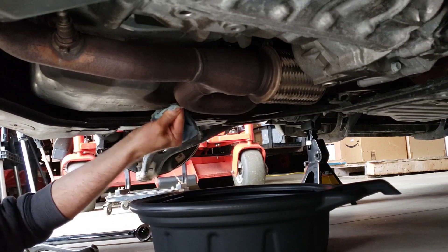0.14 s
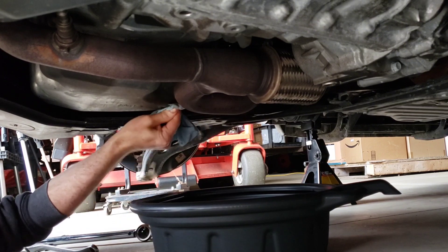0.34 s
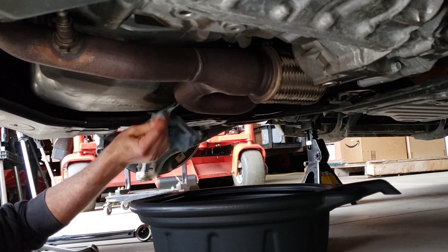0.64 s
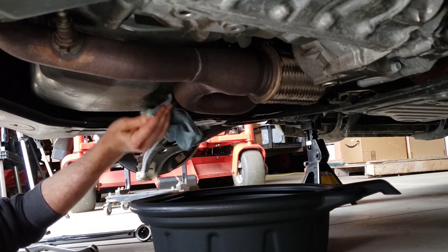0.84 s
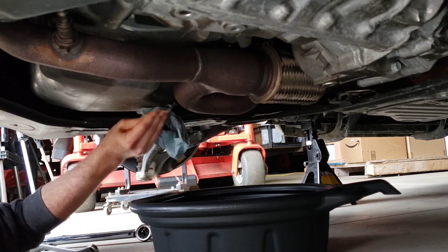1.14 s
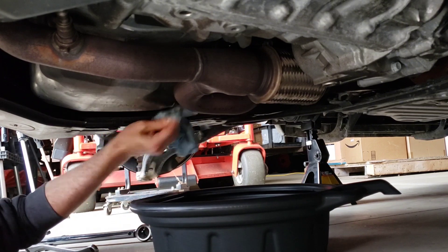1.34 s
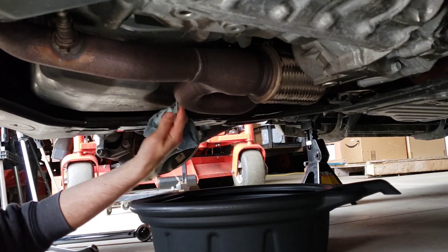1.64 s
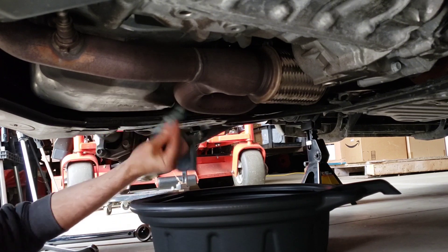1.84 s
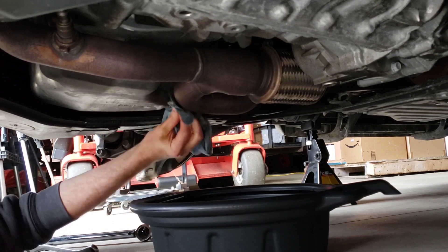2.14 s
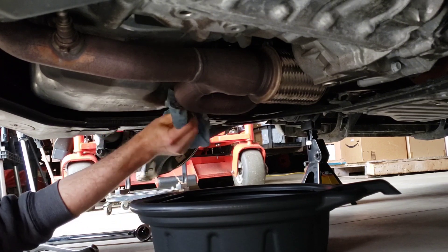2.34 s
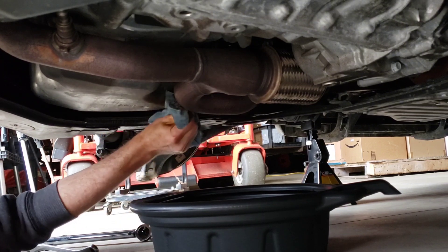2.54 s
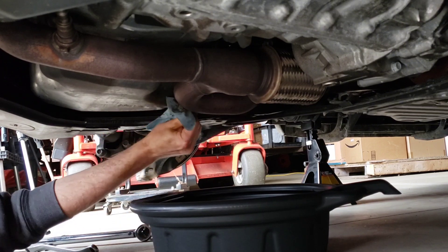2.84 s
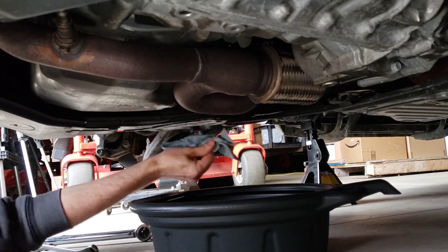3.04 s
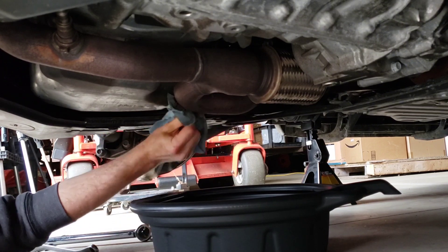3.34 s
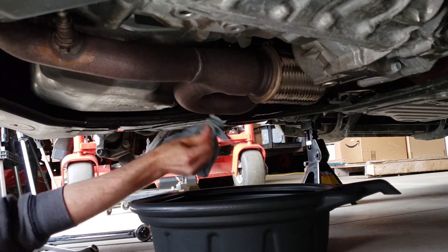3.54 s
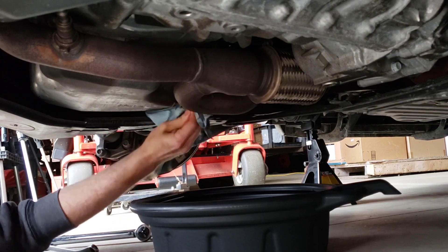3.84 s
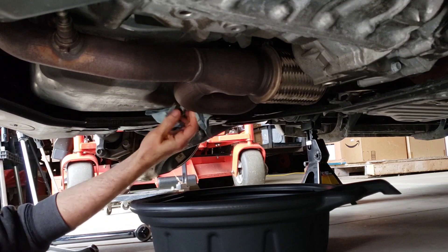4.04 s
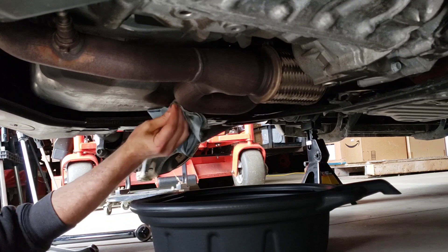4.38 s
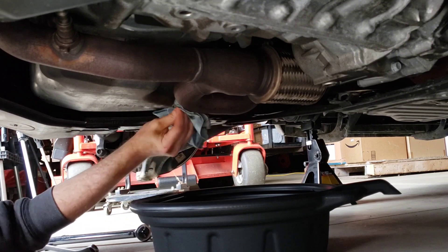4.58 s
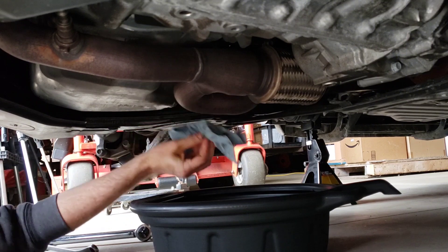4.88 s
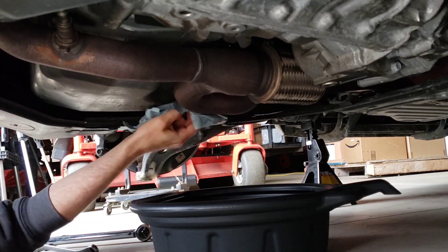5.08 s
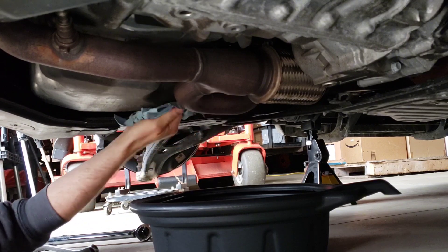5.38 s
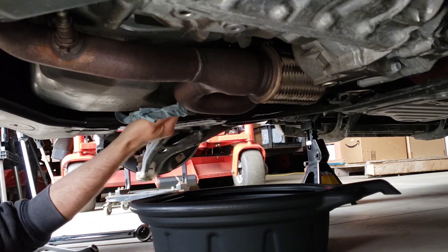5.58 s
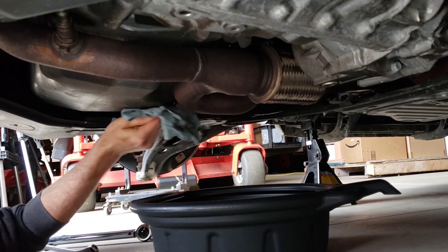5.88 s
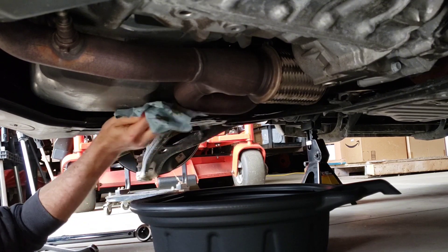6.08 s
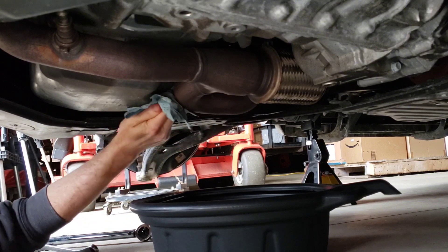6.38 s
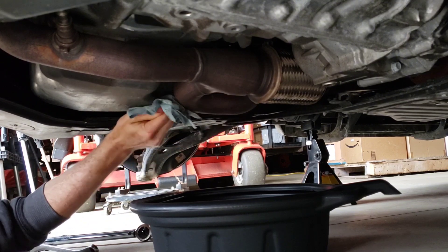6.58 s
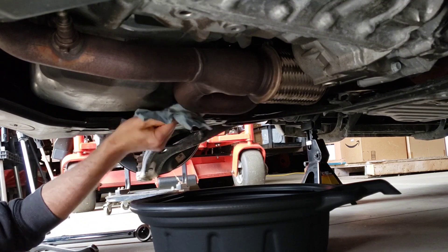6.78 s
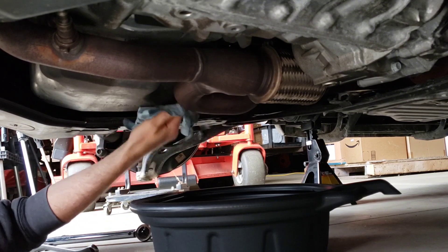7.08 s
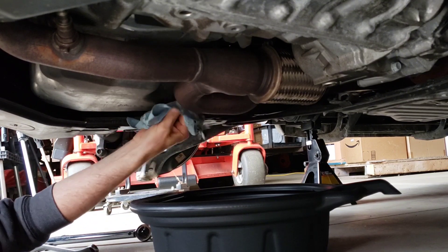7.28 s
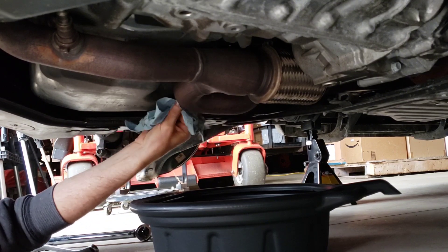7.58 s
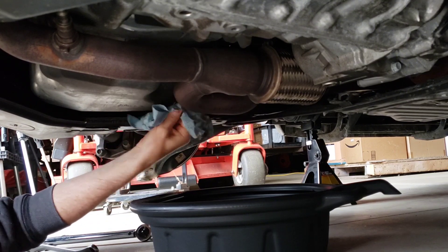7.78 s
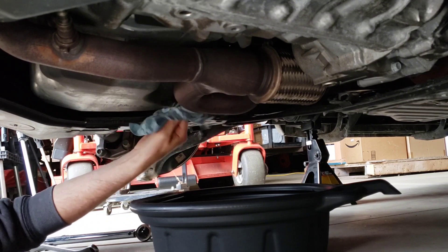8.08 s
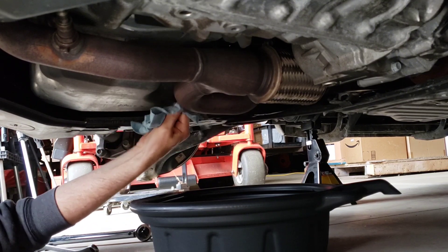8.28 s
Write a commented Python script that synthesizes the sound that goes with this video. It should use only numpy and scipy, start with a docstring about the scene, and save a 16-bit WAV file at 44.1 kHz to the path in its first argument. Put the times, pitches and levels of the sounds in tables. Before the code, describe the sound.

Under a car in an open garage, heard close in stereo, a shop rag wipes a steel oil pan. From 0 s light, irregular swishes and soft rubs come in short strokes, with a tiny tap at the start and stronger strokes around 1.2 and 1.8 s. Outside, a vehicle's low engine note and tyre roar recede, the engine gone by 3 s and the roar dulling onward. A small bird gives thin dipping, rising whistles at about 0.1, 0.8 and 1.7 s. A bright cloth flick snaps at 2.9 s; a sharp, ringing knock on the pan lands at 3.8 s. Wiping grows busier from 4.2 s, with small taps near 4.7, a crisp flick at 5.3, and brief metallic catches. Rubs, soft low bumps and another flick near 7.1 s continue, with a ringing catch at 7.7, until 8.4 s. Low uneven traffic rumble and faint hiss persist.

```python
"""Light swishes and firmer rubs of a shop rag on a steel oil pan, under a car in an open garage: random fibre noise
shaped by hand strokes, light and firm alike also exciting the pan's modes. Flicks, soft bumps, small taps and one
sharp knock are noise bursts, the taps and knock with ringing modes; catches swell single modes. Outside, a vehicle
(fading noise and a two-partial engine note) drives away over a low, uneven traffic rumble and faint hiss, while a
small bird whistles three gliding songs."""
import sys
import numpy as np
from scipy import signal
from scipy.fft import rfft, irfft, next_fast_len
from scipy.io import wavfile
from scipy.ndimage import uniform_filter1d, map_coordinates

SR = 44100
rng = np.random.default_rng(int(sys.argv[2]) if len(sys.argv) > 2 else 0)


def unload_audio(sound):
    """Save the sound as a 16-bit wav file, at the path given as the first command line argument."""
    columns = np.transpose(np.atleast_2d(sound))
    # keep every value between -1 and 1, then stretch to whole-number steps
    steps = np.round(np.clip(columns, -1, 1) * 32767)
    wavfile.write(sys.argv[1], SR, steps.astype(np.int16))


N = 371322  # length in samples

# Colour of the light swishes as heard, with a step up near 8 kHz: frequency_hz, relative density_db (per Hz)
SWISH_COLOUR = [(500, -38), (2000, -18), (5000, -8), (7300, -9), (8400, -1), (11000, 0), (13000, -1),
                (15800, -5.5)]
# Colour of the firm rubs as heard: frequency_hz, relative density_db (per Hz)
RUB_COLOUR = [(120, -31.5), (300, -2.5), (450, -7), (680, -4), (1000, -3), (1600, 1), (1950, 4), (2350, -1),
              (2900, 4), (3550, -3.5), (4050, 0), (5500, -4.5), (7500, -8), (15000, -37.5)]
# Left-right likeness of cloth and contact noise: frequency_hz, coherence (-1 to 1)
CLOSE_LIKENESS = [(290, .9), (640, 0.32), (1400, 0.13), (3100, 0.16), (7000, 0.024), (15000, 0.087)]
# Left-right likeness of the street and the soft bumps: frequency_hz, coherence (-1 to 1)
WIDE_LIKENESS = [(130, .95), (290, 0.94), (640, 0.095), (1400, -0.45), (3000, 0.98), (7000, -0.75)]


def amp(db):
    """Decibels to gain."""
    return 10 ** (np.asarray(db) / 20)


def unit(x):
    """Scale x to rms 1."""
    return x / np.sqrt(np.mean(x ** 2) + 1e-20)


def along(points, hz):
    """Read (Hz, value) points along a log frequency axis."""
    point_hz, values = np.transpose(points)
    return np.interp(np.log(hz + 1), np.log(point_hz), values)


def curves(rows):
    """Draw each column after the time as one value per sample."""
    times, *columns = np.transpose(rows)
    return [np.interp(np.arange(N) / SR, times, column) for column in columns]


def wobble(rate_hz):
    """A smooth random curve through rate_hz random knots a second."""
    knots = rng.standard_normal(int(N * rate_hz / SR) + 4)
    return map_coordinates(knots, [np.arange(N) * rate_hz / SR])


def filtered(x, response):
    """Multiply the spectrum of x by a response of frequency."""
    size = x.shape[-1]
    padded = next_fast_len(size + 8192)
    return irfft(rfft(x, padded) * response(np.fft.rfftfreq(padded, 1 / SR)), padded)[..., :size]


def noise(size=N):
    """Two unrelated channels of white noise."""
    return rng.standard_normal((2, size))


def stereo(pair, spectrum, likeness):
    """Colour two unrelated signals and mix them, as mid and side, to a left-right pair of rms 1."""
    def mid_side_gains(hz):
        angle = np.arccos(np.clip(along(likeness, hz), -1, 1)) / 2
        return amp(along(spectrum, hz)) * [np.cos(angle), np.sin(angle)]

    mid, side = filtered(pair, mid_side_gains)
    return unit(np.array([mid + side, mid - side]))


def dying(pair, decay):
    """Let each frequency of a noise die at its own speed."""
    hz, t, bins = signal.stft(pair, SR, nperseg=128)
    faded = bins * amp(-60 * t / along(decay, hz)[:, None])
    return signal.istft(faded, SR, nperseg=128)[1][:, :pair.shape[1]]


def add(track, start_s, sound):
    """Mix a sound into the track from start_s on."""
    part = track[:, max(round(start_s * SR), 0):][:, :sound.shape[-1]]
    part += sound[..., :part.shape[1]]


def wiping(rustle_db=-74, rustle_swing_db=3.5, drop_db=20.5, roundness=1.385):
    """Swish and rub strength: strokes gather speed and slow, pressure adds rub, the bunched rag rustles on."""
    # hand strokes: fastest_s, run_up_s, run_out_s, relative swish level_db, pressure_db (rub over swish)
    strokes = [(0.03, 0.096, 0.079, -61, -4), (0.19, 0.085, 0.13, -62.5, -1),
               (0.477, 0.11, 0.063, -55, -1.5), (0.606, 0.124, 0.139, -50, -4),
               (0.878, 0.1, 0.077, -62, -15), (1.002, 0.13, 0.067, -53.0, -8),
               (1.217, 0.067, 0.06, -42, -11), (1.447, 0.14, 0.091, -55.5, -8.5),
               (1.489, 0.041, 0.033, -48.0, -3.5), (1.67, 0.084, 0.127, -61.5, -3),
               (1.804, 0.05, 0.089, -45.5, -9.5), (2.122, 0.43, 0.084, -60.0, -30),
               (2.22, 0.091, 0.246, -59, -7.5), (2.367, 0.056, 0.312, -63, -3.5),
               (2.745, 0.107, 0.146, -59.5, -8), (2.953, 0.033, 0.045, -41.5, -9.5),
               (3.474, 0.054, 0.056, -45.0, -23), (3.648, 0.058, 0.172, -60.5, -16),
               (3.754, 0.046, 0.053, -60, -3), (3.873, 0.089, 0.19, -57.5, -7),
               (4.196, 0.055, 0.106, -44.5, -5.5), (4.332, 0.18, 0.088, -47.5, 0),
               (4.55, 0.05, 0.048, -52, -2), (4.752, 0.053, 0.041, -40.5, -4),
               (5.072, 0.11, 0.072, -53, -8), (5.142, 0.16, 0.103, -58.5, 0.5),
               (5.316, 0.068, 0.1, -50, -2), (5.416, 0.076, 0.25, -67, 1.5), (5.735, 0.13, 0.062, -59, -6),
               (5.891, 0.14, 0.097, -52.5, -0.5), (6.057, 0.048, 0.11, -49, -7.5),
               (6.238, 0.17, 0.13, -49.0, -3), (6.365, 0.1, 0.068, -54, -0.5),
               (6.517, 0.064, 0.064, -45, -5.5), (6.607, 0.043, 0.056, -57.5, -4),
               (6.792, 0.13, 0.074, -48, -3.5), (6.882, 0.098, 0.045, -59.5, -6),
               (7.089, 0.044, 0.085, -49.5, -5.5), (7.315, 0.15, 0.056, -57.5, -4),
               (7.737, 0.052, 0.14, -58, 0.5), (7.91, 0.039, 0.074, -60.5, -6),
               (8.08, 0.052, 0.098, -58, -2.5), (8.182, 0.061, 0.076, -59.5, -6.5)]
    t = np.arange(N) / SR
    swish_power = amp(rustle_db + rustle_swing_db * wobble(9)) ** 2
    rub_power = np.zeros(N)
    for s, run_up, run_out, db, pressure_db in strokes:
        span = slice(*np.searchsorted(t, [s - 2 * run_up, s + 2 * run_out]))
        away = np.maximum((s - t[span]) / run_up, (t[span] - s) / run_out)
        # drop_db down after one run-up or run-out; roundness 1 is a pointed top, 2 a bell
        speed = amp(db - drop_db * away ** roundness)
        swish_power[span] += speed ** 2
        rub_power[span] += (speed * amp(pressure_db)) ** 2
    return np.sqrt(swish_power), np.sqrt(rub_power)


def fibres(rate_hz, size_db, smooth):
    """Friction: fibres snap free at random, over the smooth hiss of the weave."""
    sizes = amp(size_db * np.minimum(rng.exponential(size=N), 4))
    snaps = (rng.random(N) < rate_hz / SR) * sizes
    return unit(snaps * noise()) + smooth * noise()


def pan_ring(rattle=0.31):
    """The steel's answer to one blow: decaying modes, jittered in phase by rattle, out of step left and right."""
    # oil pan modes: frequency_hz, relative level_db, t60_s
    modes = [(922, -19.5, .16), (970, -18, .15), (1257, -17, .13), (1332, -8, .13), (1469, -18, .3),
             (1517, -22, .36), (1883, 2.5, .085), (2374, -19, .12), (2885, -12, .07), (3982, -3, .065),
             (5085, -9, .06), (5605, -9, .06), (6727, -4, .055), (8560, -11, .05), (9352, -6, .05),
             (11075, -9, .06), (11520, -5, .05), (12402, -5, .05)]
    t = np.arange(SR // 2) / SR
    hz, db, t60 = np.transpose(modes)[:, :, None]
    jitter = unit(uniform_filter1d(rng.standard_normal((len(modes), len(t))), size=300))
    phase = rng.uniform(0, 2 * np.pi, hz.shape) + rattle * jitter  # radians
    fade = amp(db - 60 * t / t60) / np.linalg.norm(amp(db))
    turns = 2 * np.pi * hz * t + phase
    return np.array([np.sum(fade * np.sin(turns + side * np.pi / 5), axis=0) for side in (1, -1)])


def rag(swish_db=3.5, rub_db=1.0, ring_db=-10, sing_db=-12, soft_hz=2400, damp_t60=0.034):
    """Sliding cloth hisses, pressed harder it sounds fuller; light and firm strokes both set the pan ringing."""
    swish, rub = wiping()
    judder_db = 1.3 * wobble(130) + 1.4 * wobble(35)  # the cloth grips and slips unevenly
    light_grain = stereo(fibres(rate_hz=4000, size_db=3.0, smooth=1.4), SWISH_COLOUR, CLOSE_LIKENESS)
    firm_grain = stereo(fibres(rate_hz=1200, size_db=1.0, smooth=1.0), RUB_COLOUR, CLOSE_LIKENESS)
    light = swish * amp(swish_db + judder_db) * light_grain
    firm = rub * amp(rub_db + judder_db + 0.59 * wobble(70)) * firm_grain
    # a soft pad pressed on the sheet drives mostly its low modes and shortens their ring
    push = filtered(firm[:1], lambda hz: 1 / (1 + (hz / soft_hz) ** 4))
    damped_steel = pan_ring() * amp(-60 * np.arange(SR // 2) / SR / damp_t60)
    damped_steel /= np.linalg.norm(damped_steel[0])
    drive = amp(ring_db) * push + amp(sing_db) * light[:1]
    return light + firm + signal.fftconvolve(drive, damped_steel, axes=1)[:, :N]


def puffs(events, spectrum, likeness, t60):
    """Soft contacts without a ring: short bursts of coloured noise."""
    out, t = np.zeros((2, N)), np.arange(SR // 2) / SR
    for s, db, rise in events:
        envelope = amp(db - 60 * t / t60) * (1 - np.exp(-t / rise))
        add(out, s, envelope * stereo(noise(len(t)), spectrum, likeness))
    return out


def flicks():
    """Folds of the cloth flick free in bright puffs."""
    # fold releases: start_s, relative level_db, rise_s
    releases = [(.80, -60.5, .002), (1.397, -54, .002), (2.943, -39, .0006), (3.055, -55.5, .0018),
                (3.42, -51.5, 0.00093), (5.287, -37.5, 0.00061), (6.026, -51, .0011), (7.08, -40, .007),
                (8.329, -53.5, .001)]
    return puffs(releases, SWISH_COLOUR, CLOSE_LIKENESS, t60=.12)


def catches(rise_cycles=32, t60_cycles=250, waver=1.05, rough_db=1.0):
    """Dragging over an edge swells one mode unevenly, which then rings out; low modes are slower."""
    # cloth catching an edge: peak_s, relative level_db, mode_hz
    edges = [(1.49, -53, 1884), (2.13, -68, 620), (2.85, -62, 1900), (2.943, -49, 1900), (3.76, -52, 1880),
             (4.21, -47.5, 1884), (4.25, -60, 677), (4.57, -52, 1885), (4.61, -62, 1450),
             (4.705, -48.5, 1864), (4.752, -45.5, 1874), (5.16, -58.5, 1835), (5.30, -52.5, 1840),
             (5.345, -57, 1500), (6.52, -51, 1910), (6.55, -64.5, 855), (6.80, -60, 853),
             (7.11, -59.5, 1360), (7.315, -58.5, 877), (7.742, -43.5, 1890), (7.79, -64, 864),
             (8.184, -59.5, 1880)]
    out, t = np.zeros((2, N)), np.arange(-SR // 10, SR // 3) / SR
    slips = np.array([waver * wobble(150), rough_db * wobble(200)])  # phase in radians, level in dB
    for s, db, hz in edges:
        cycles = hz * t
        swell = np.where(t < 0, np.exp(-(cycles / rise_cycles) ** 2), amp(-60 * cycles / t60_cycles))
        drift, grip_db = np.roll(slips, -round(s * SR), axis=1)[:, :len(t)]
        add(out, s + t[0], amp(db + grip_db) * swell * np.sin(2 * np.pi * cycles + drift))
    return out


def taps(crack_db=-2, steel_db=2, burst_s=0.012, attack_s=0.0018, buzz_db=-30, buzz_t60=0.32):
    """Each hard contact cracks, strongest in its first milliseconds, and rings the pan over a faint noisy buzz."""
    # contacts with the pan: start_s, relative level_db, relative ring_db
    contacts = [(.045, -53, -12), (3.635, -58.5, -8), (3.785, -24, 10), (4.667, -59.5, 9),
                (4.698, -50.5, 2), (5.286, -55.5, -6.5), (5.432, -56.5, -7.5), (7.732, -54.5, 4),
                (8.329, -60.5, -0.5)]
    # colour of the crack: frequency_hz, relative density_db (per Hz)
    crack_colour = [(300, -51), (650, -31), (950, -11), (1400, 2), (1950, 1), (2300, -5.5), (2950, 10.5),
                    (3500, -3.5), (4100, 2.5), (7000, 2), (12500, 9), (15800, -6.5)]
    # fading of the crack: frequency_hz, t60_s
    crack_decay = [(1000, 0.08), (2500, 0.089), (6000, 0.1), (14000, 0.1)]
    out, t = np.zeros((2, N)), np.arange(SR // 2) / SR
    for s, db, ring_db in contacts:
        crack = dying(stereo(noise(len(t)), crack_colour, CLOSE_LIKENESS), crack_decay)
        crack *= 1 + 0.99 * np.exp(-(t / burst_s) ** 4)
        ring = amp(steel_db) * pan_ring() * (1 - np.exp(-t / 0.0031))
        buzz = amp(buzz_db - 60 * t / buzz_t60) * stereo(noise(len(t)), RUB_COLOUR, CLOSE_LIKENESS)
        contact = amp(crack_db) * crack + amp(ring_db) * (ring + buzz)
        add(out, s, amp(db) * (1 - np.exp(-t / attack_s)) * contact)
    return out


def bumps(bump_db=3):
    """The hand bumps softly against the underbody: low puffs."""
    # hand contacts: start_s, relative level_db, rise_s
    contacts = [(1.19, -53, 0.015), (2.935, -60, .012), (4.22, -58.5, .012), (4.33, -53, 0.013),
                (4.74, -62, 0.013), (5.3, -55.5, .012), (6.05, -58, .012), (6.51, -58.5, 0.011),
                (6.765, -53, 0.0037), (8.08, -53.5, 0.0074)]
    # colour of a bump: frequency_hz, relative density_db (per Hz)
    thud_colour = [(50, -27), (110, -2.5), (170, -1), (300, -5), (420, -19), (1200, -50.5)]
    return amp(bump_db) * puffs(contacts, thud_colour, WIDE_LIKENESS, t60=0.36)


def underbody(x, reach_s=0.011, count=8):
    """Close reflections between the floor and the car, a different set left and right."""
    echoes = np.zeros((2, SR // 10))
    for channel in echoes:
        delays = (rng.uniform(.001, reach_s, count) * SR).astype(int)
        channel[delays] = (-1) ** np.arange(count) / np.sqrt(count)
    return signal.fftconvolve(x, echoes, axes=1)[:, :N]


def garage(x):
    """The diffuse answer of floor, underbody and walls: a decaying noise tail."""
    # room decay: frequency_hz, t60_s
    room_decay = [(200, 0.55), (1500, 0.42), (5000, 0.16), (14000, 0.1)]
    tail = dying(noise(SR // 2), room_decay)
    delayed = np.pad(x, ((0, 0), (300, 0)))  # samples before the tail begins
    return signal.fftconvolve(delayed, tail / np.linalg.norm(tail[0]), axes=1)[:, :N]


def bird(waver=0.017, drift=0.008, call_db=-3.5, flutter_db=4.5, blur_t60=0.18, fullness=0.24):
    """Thin wavering whistles that dip and then climb, blurred by their many ways in from outside."""
    # songs: start_s, length_s, top_hz (before the quaver), relative level_db
    songs = [(.08, 0.23, 8300, -63), (0.811, 0.29, 8130, -64), (1.654, .345, 8000, -60.5)]
    start_hz, low_hz = 6150, 5840
    turn, bend = .2, 1.7  # share of the song before the lowest pitch; curve of the climb
    out = np.zeros((1, N))
    quaver = 1 + waver * wobble(350) + drift * wobble(30)
    for s, length, top_hz, db in songs:
        u = np.linspace(0, 1, round(length * SR))
        sag = np.maximum(1 - u / turn, 0)
        climb = np.maximum((u - turn) / (1 - turn), 0)
        pitch = low_hz + (start_hz - low_hz) * sag + (top_hz - low_hz) * climb ** bend
        phase = 2 * np.pi * np.cumsum(pitch * quaver[round(s * SR):][:len(u)]) / SR
        envelope = np.abs(np.sin(np.pi * u)) ** fullness
        add(out, s, amp(db + call_db) * envelope * np.sin(phase))
    song = out * amp(flutter_db * wobble(91.4))
    paths = noise(SR // 4) * amp(-60 * np.arange(SR // 4) / SR / blur_t60)
    blurred = signal.fftconvolve(song, paths / np.linalg.norm(paths[0]), axes=1)[:, :N]
    return .5 * song + 1.37 * blurred


def engine(unsteady_db=2.5):
    """The exhaust note of the vehicle pulling away: a fundamental and its octave."""
    # engine note: time_s, firing_hz, relative fundamental_db, relative octave_db
    firing = [(0, 66.7, -51, -56.5), (.5, 63.1, -64, -53), (.9, 62.17, -58, -59), (1.3, 66.9, -51.5, -68),
              (1.85, 71.53, -50, -67), (2.25, 83.55, -57.5, -76), (2.45, 81.3, -63, -82),
              (3.0, 76, -98.5, -98)]
    hz, first_db, octave_db = curves(firing)
    phase = 2 * np.pi * np.cumsum(hz) / SR + 0.44 * wobble(11)
    note = amp(first_db) * np.sin(phase) + amp(octave_db) * np.sin(2 * phase)
    return np.sqrt(2) * amp(unsteady_db * wobble(15)) * note


def tilt(pair, left_db=-0.3):
    """Lean a pair slightly to the right."""
    return pair * amp([[left_db], [-left_db]])


def vehicle(drone_db=-57, tyre_db=-54.0, dull_hz=1900, doubling_s=1.46, drone_fade_share=.6):
    """Drone and tyre roar fade with distance; the roar also dulls, and the drone carries better."""
    # colour of the low drone: frequency_hz, relative density_db (per Hz)
    drone_colour = [(80, -48), (135, -3), (180, -3), (220, -7), (320, -8), (400, -19.5), (600, -31),
                    (1200, -54)]
    # colour of the tyre roar: frequency_hz, relative density_db (per Hz)
    roar_colour = [(200, -12.5), (500, -16.5), (750, -5), (1000, 3), (1400, 1.5), (1900, -1), (2600, -14.5),
                   (3400, -50), (7000, -75.5)]
    near = 1 / (1 + np.arange(N) / SR / doubling_s)  # the starting distance doubles in doubling_s
    drone = amp(drone_db) * near ** drone_fade_share * stereo(noise(), drone_colour, WIDE_LIKENESS)
    roar = stereo(noise(), roar_colour, WIDE_LIKENESS)
    dull = filtered(roar, lambda hz: 1 / (1 + (hz / dull_hz) ** 4))
    tyres = amp(tyre_db + .6 * wobble(4.8)) * near * (near * roar + (1 - near) * dull)
    return tilt(drone) + tyres


def traffic():
    """Low traffic rumble: random low noise at a roughly steady, uneven level."""
    # uneven rumble level: time_s, level_db
    uneven_level = [(0, -50), (1, -49), (2.5, -51.5), (3.5, -51.5), (4.4, -53), (4.95, -56), (5.25, -50),
                    (6, -50), (6.45, -54.5), (6.8, -51), (7.8, -53.5), (8.42, -51)]
    # colour of the rumble: frequency_hz, relative density_db (per Hz)
    rumble_colour = [(15, -25), (30, -23), (48, -10.5), (68, -0.5), (82, -2.5), (100, -4.5), (130, -11),
                     (180, -23), (400, -69.5)]
    return tilt(amp(curves(uneven_level)[0]) * stereo(noise(), rumble_colour, WIDE_LIKENESS))


def hiss(level_db=-70.5):
    """Faint steady noise behind everything."""
    # colour of the hiss: frequency_hz, relative density_db (per Hz)
    hiss_colour = [(300, 9.5), (2500, -4.5), (7500, -16.5), (8600, 8.5), (15800, -3.5)]
    return amp(level_db) * stereo(noise(), hiss_colour, WIDE_LIKENESS)


def scene(room_db=-17, close_db=-9):
    """The work on the pan in its room, with the street behind."""
    cloth = rag() + flicks()
    work = cloth + amp(close_db) * underbody(cloth) + catches() + taps() + bumps()
    street = vehicle() + engine() + traffic() + hiss()
    return work + amp(room_db) * garage(work) + bird() + street


def record(dry, top_hz=15850):
    """Colour left and right differently and let nothing pass from top_hz up."""
    # unequal colour of the channels: frequency_hz, left minus right level_db
    balance = [(200, 2), (400, -0.5), (700, -7), (1300, -1), (2400, 3.5), (4400, 0), (8000, 2),
               (15000, -4.5)]
    halves = np.array([[.5], [-.5]])
    return filtered(dry, lambda hz: amp(along(balance, hz) * halves) * (hz < top_hz))


dry = scene()
out = record(dry)
unload_audio(out)
```